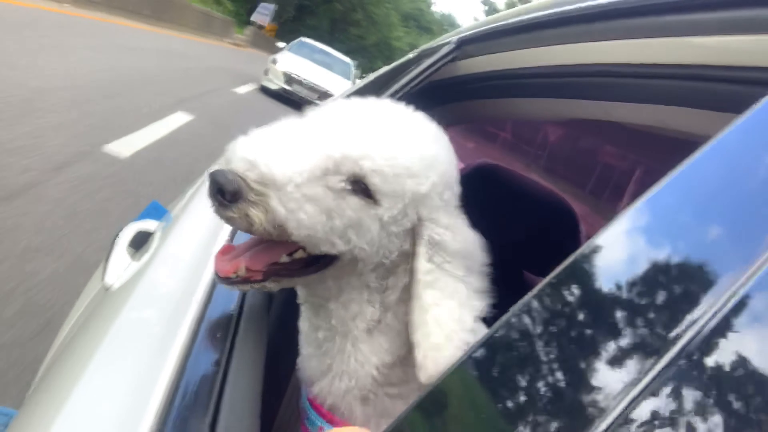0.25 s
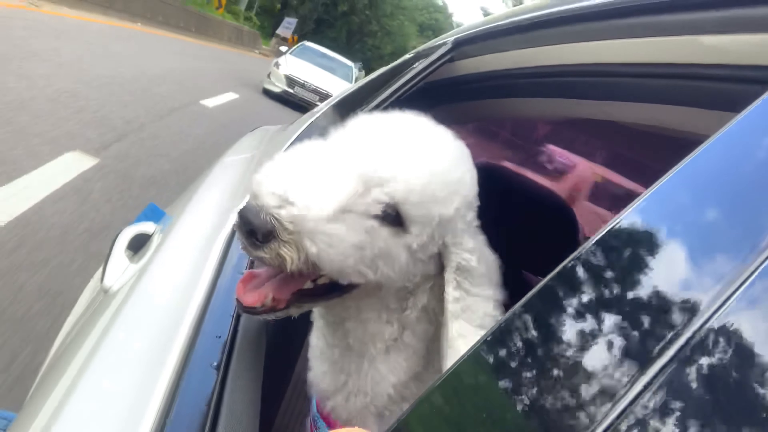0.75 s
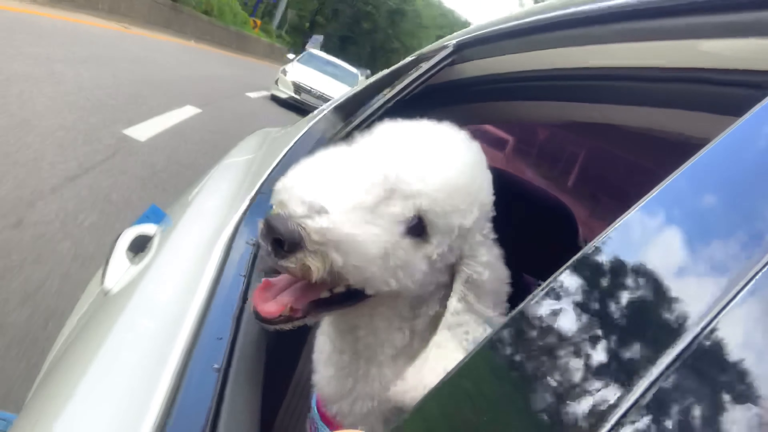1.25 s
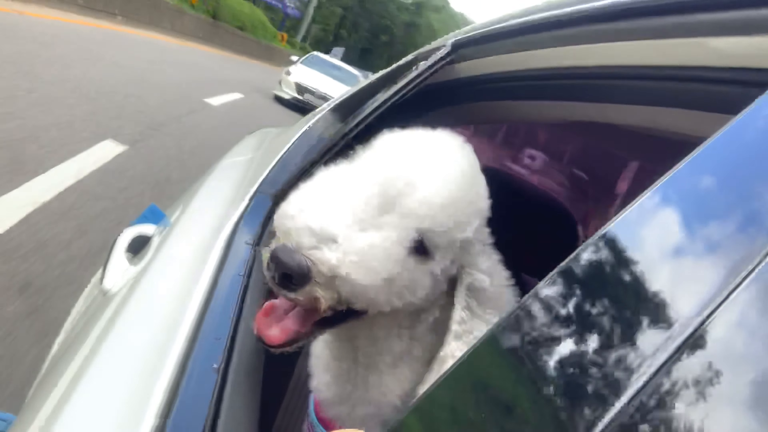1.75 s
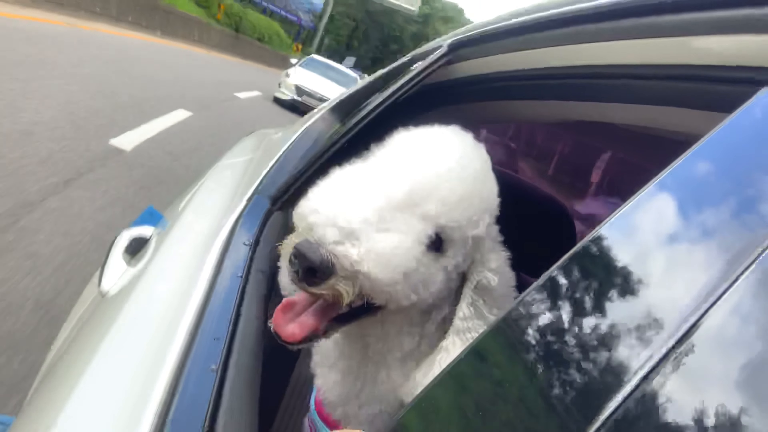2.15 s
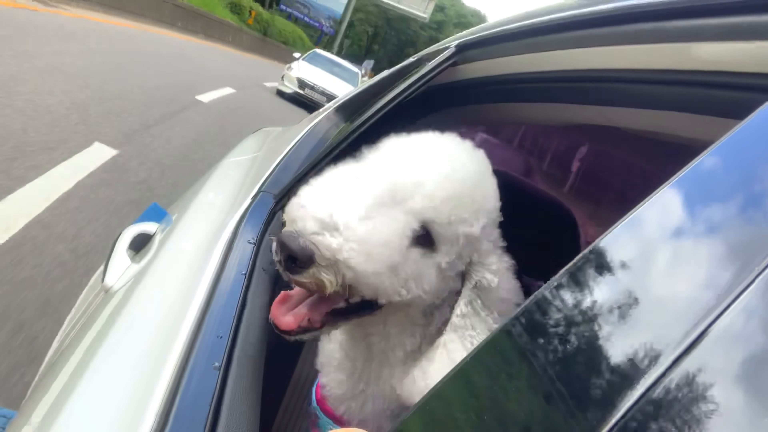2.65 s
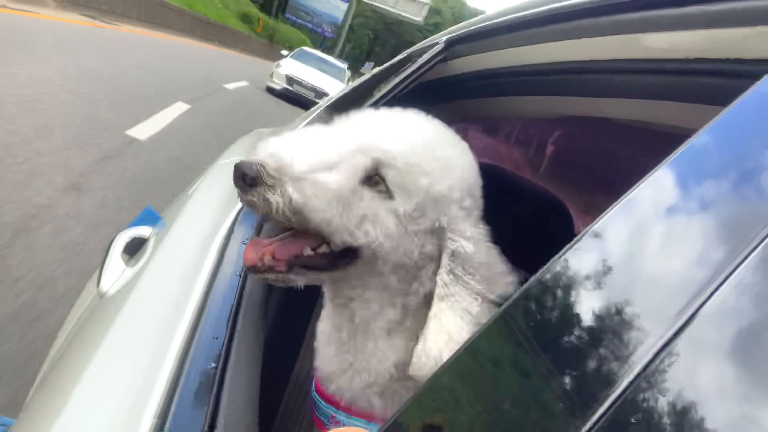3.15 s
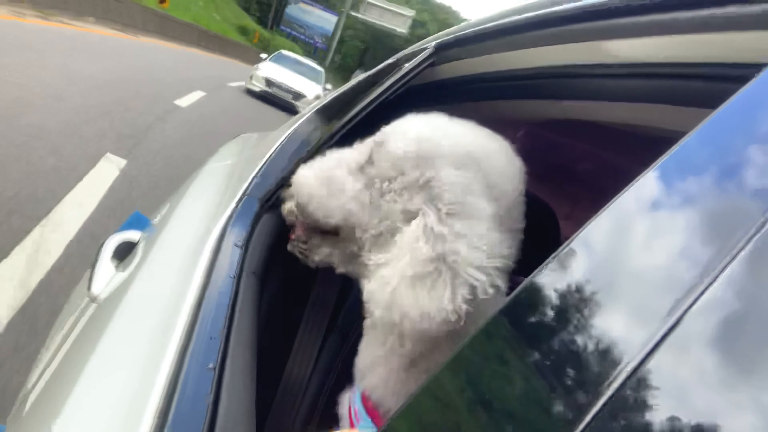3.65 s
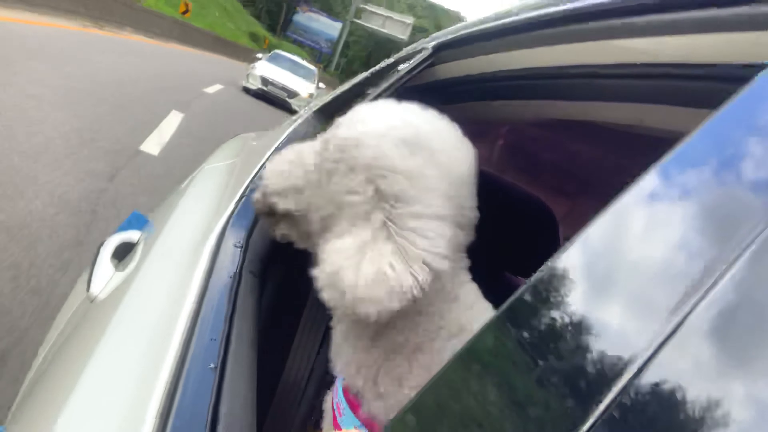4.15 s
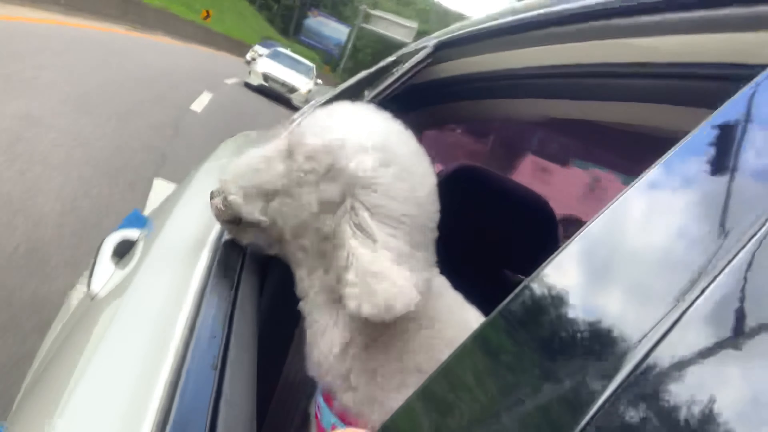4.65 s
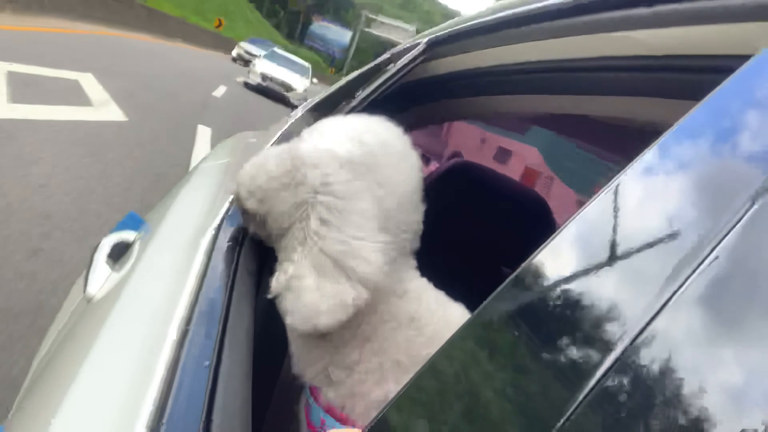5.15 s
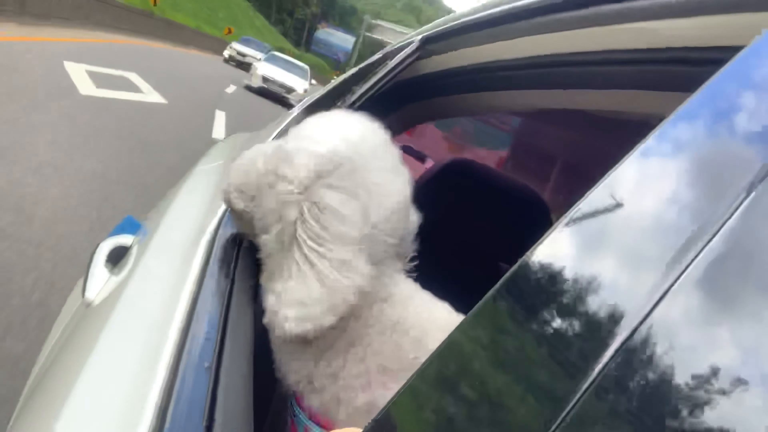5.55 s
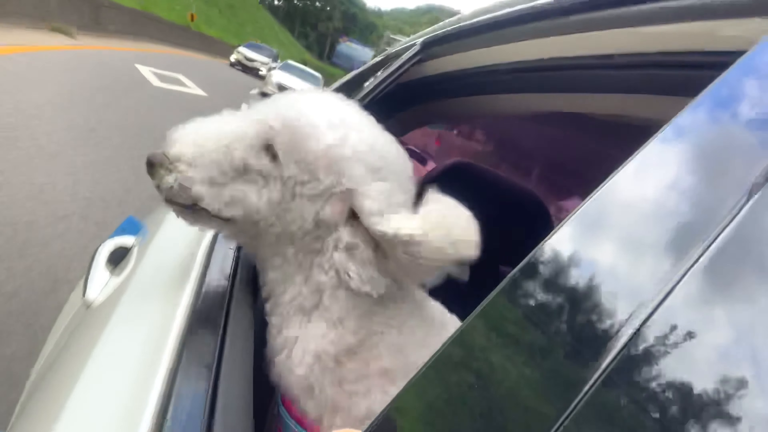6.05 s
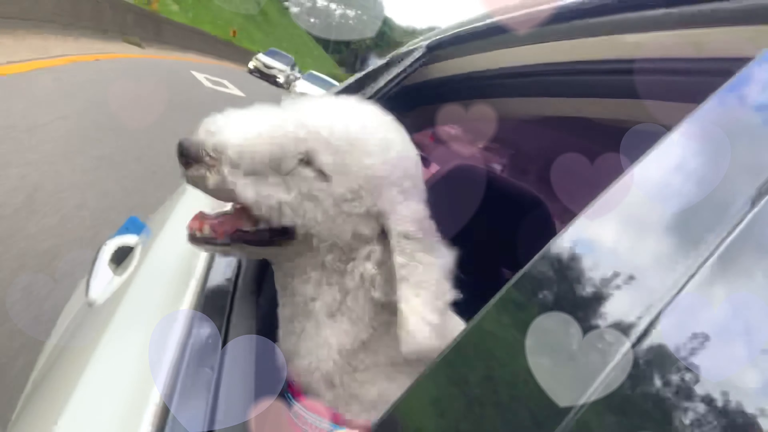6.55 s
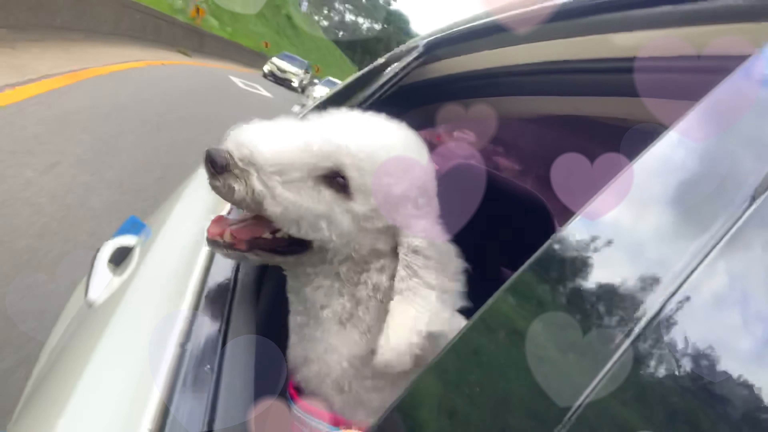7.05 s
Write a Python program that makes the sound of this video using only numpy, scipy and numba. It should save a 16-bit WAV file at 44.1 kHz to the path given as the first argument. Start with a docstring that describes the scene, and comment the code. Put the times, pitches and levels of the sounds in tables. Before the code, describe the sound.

At the open window of a car driving along a road, wind batters a phone microphone. Irregular deep thuds, fluttering flaps and short dry pops come in clusters over turbulent rumble and a dull rush of air and tyres. From just over three seconds an oncoming lorry adds a low roar, soft swish and hum dropping in pitch, mostly buried under the wind. The hardest blows distort.

```python
"""Thuds, flaps and pops of wind on a phone's microphone, held at the open window of a moving car.
Eddies of the slipstream are swells of band-limited noise, and torn flow gives short pops with a snap on top;
beneath lie turbulent rumble and the rush of air and tyres, noise whose bands flicker. From 3.3 s an oncoming
lorry adds a roar, a swish combed by the road echo, and a hum and a brief whine that fall by the Doppler effect.
The loudest blows overload the microphone."""
import sys
import numpy as np
from scipy import signal
from scipy.fft import rfft, irfft
from scipy.io import wavfile
from scipy.ndimage import uniform_filter1d
from numba import njit

SR = 44100
rng = np.random.default_rng(int(sys.argv[2]) if len(sys.argv) > 2 else 0)


def dump(signal):
    """Clip the signal to [-1, 1] and save it as 16-bit WAV at the path in sys.argv[1]."""
    limited = np.clip(np.atleast_2d(signal).T, -1, 1)
    pcm = np.round(limited * 32767).astype(np.int16)
    wavfile.write(sys.argv[1], SR, pcm)


N = 321394

# eddies that strike the port: (time [s], length [ms], thud level [dB], flap level [dB], crackle level [dB])
EDDY_BLOWS = [(0.118, 8.6, -14, -8.5, -16), (0.166, 14, -24, -19, -27), (0.208, 32, -5.5, -8.5, -25),
              (0.259, 23, -10.5, -29, -19.5), (0.294, 6.1, -13, -0.5, -13), (0.33, 13, -16, -13.5, -21),
              (0.352, 8.2, -21, -21, -20), (0.405, 6.3, -17, -20, -27), (0.433, 43, -15, -12.5, -17.5),
              (0.561, 18, -16, -4.5, -16), (0.622, 26, -12.5, -16.5, -21.5), (0.678, 9.9, -18, -28, -14.5),
              (0.745, 40, -17, -18, -19.5), (0.79, 20, -24, -18, -25), (0.84, 16, -19.5, -23, -28),
              (0.939, 20, -9.5, -23.5, -42), (1.011, 31, -16.5, -12.5, -29), (1.134, 5.9, -13, -5.5, -20),
              (1.168, 14, -6.5, -16, -23), (1.19, 16, -10.5, -14, -20), (1.236, 19, -12.5, -12, -20),
              (1.291, 24, -7, -22, -20), (1.379, 38, -10, -17, -20.5), (1.425, 10, -23, -21, -26),
              (1.475, 11, -22, -24, -25), (1.545, 35, -13, -14, -23.5), (1.578, 11, -19, -19, -24),
              (1.631, 12, -26, -12, -13.5), (1.669, 44, -13, -10.5, -20.5), (1.721, 12, -4.5, -14, -25),
              (1.785, 17, -17, -15, -23), (1.84, 17, -14, -14, -25), (1.925, 14, -13.5, -20, -28),
              (1.965, 33, -13.5, -15.5, -15.5), (2.073, 8.5, -18, -15, -27), (2.11, 23, -16, -16, -22.5),
              (2.153, 12, -17, -18, -26), (2.223, 17, -28, -19, -25), (2.33, 12.4, -5, -10.5, -18.5),
              (2.39, 22, -17, -16, -26), (2.457, 11, -7, -7, -18.5), (2.516, 17, -15, -12, -33),
              (2.549, 22, -6.5, -24, -22.5), (2.605, 14, -21, -21, -28), (2.708, 20, -6, -14, -20),
              (2.731, 5.8, -17, -18, -26), (2.742, 7.4, -17, -15, -21), (2.762, 7.6, -15, -14, -14),
              (2.787, 13, -12.5, -7, -15), (2.834, 14.5, -10, -5.5, -17), (2.85, 22, -11, -20, -33),
              (2.915, 8.6, -17.5, -28, -37), (2.934, 12, -24, -24, -30), (2.984, 12, -18.5, -20, -21),
              (3.085, 33, -23, -21.5, -26), (3.203, 6.6, -22, -12, -12), (3.259, 23, -10.5, -19, -26),
              (3.404, 43, -32, -12.5, -22.5), (3.607, 12.5, -12, -7, -12), (3.695, 43, -6.5, -31, -21),
              (3.775, 23, -6, -5, -13.5), (3.842, 9.6, -8, -22, -33), (3.938, 14, -12, -9, -13),
              (3.982, 19, -7.5, -9, -17), (4.072, 13, -11, -25, -26), (4.146, 9.6, -18, -6, -33),
              (4.208, 13, -13, -8.5, -20), (4.279, 65, -8.5, -15, -33), (4.381, 11.4, -17, -6.5, -16),
              (4.481, 11, -20, -6.5, -30), (4.534, 27, -12.5, -11, -27), (4.581, 21, -15, -8, -12.5),
              (4.634, 55, -10.5, -10, -22), (4.789, 56, -10, -14, -30), (4.876, 40, -25, -18, -21),
              (4.965, 12, -14, -15.5, -39), (5.139, 11, -14, -24, -46), (5.221, 8.6, -9.5, -24, -38),
              (5.32, 15, -4, -11, -33), (5.409, 15, -15, -19, -15), (5.517, 8.3, -11.5, -14, -44),
              (5.579, 8.1, -5, -8, -26), (5.623, 5.6, -10, -6.5, -22), (5.666, 16, -10.5, -6, -28),
              (5.806, 100, -11.5, -10, -25), (5.85, 74, -19, -12.5, -15), (6.007, 14, -7, -12, -38),
              (6.071, 22, -10, -9, -32), (6.134, 8.3, -9, -25, -15.5), (6.198, 22, -10, -11, -12),
              (6.256, 7.3, -9.5, -13, -36), (6.281, 7.2, -8, -9, -37), (6.309, 13.4, -16, -10, -16),
              (6.418, 18, -5, -12.5, -21.5), (6.495, 15, -18, -10, -35), (6.558, 24, -12.5, -24, -35),
              (6.69, 60, -18, -22, -27), (6.773, 16, -10, -36, -22), (6.837, 15, -7, -32, -42),
              (6.927, 75, -10, -23, -49), (7.028, 6.2, -9, -13, -37), (7.113, 14, -10.5, -8, -27),
              (7.191, 8.3, -11, -24, -19), (7.263, 100, -8.5, -11.5, -17)]
# thud, flap and crackle of one eddy, a row each:
# (centre [Hz], width [Hz], share of the eddy's length [0-1], added length [ms], lag [ms])
EDDY_PARTS = [(73.4, 109, 0.85, 9.1, 2.5), (236.7, 219, 0.36, 0.78, 0.53), (499, 326, 0.55, 3.1, -1.5)]
GRAIN_DB = 4.5  # spread of the grains in flap and crackle
# weaker eddies at random; thud and flap are relative to the stream
SMALL_PER_S, SMALL_MS, SMALL_THUD_DB, SMALL_FLAP_DB, SMALL_SCATTER_DB = 14, 11.3, 0, 0, 3
# crackle relative to the stream when calm, and dB lost per dB of stream above calm
SMALL_CRACKLE_DB, CRACKLE_DULLS = -11, 1


def small_eddies():
    """Turbulence is random: weak eddies come at chance moments and follow the strength of the stream."""
    s, size, *chance = scattered(SMALL_PER_S, size=4).T
    gust = gust_db(s)
    crackle_db = SMALL_CRACKLE_DB - CRACKLE_DULLS * np.maximum(gust - CALM_DB, 0)
    parts_db = (SMALL_THUD_DB, SMALL_FLAP_DB, crackle_db)
    levels = [gust + db + SMALL_SCATTER_DB * c for db, c in zip(parts_db, chance)]
    return np.transpose([s, SMALL_MS * np.exp(0.25 * size), *levels])


def buffets():
    """Turbulent pressure: each eddy is a swell of noise in three bands, with its own length and lag in each."""
    eddies = np.vstack([EDDY_BLOWS, small_eddies()])
    out = np.zeros(N)
    for part, (hz, width, share, more_ms, lag_ms) in enumerate(EDDY_PARTS):
        # the faster parts come in separate grains; the thud does not
        air = band(hz, width) * undb(min(part, 1) * GRAIN_DB * walk(180))
        for s, ms, *dbs in eddies:
            half = int((share * ms + more_ms) * SR / 1000)
            k = np.arange(-half, half)
            swell = np.cos(np.pi / 2 * k / half) ** 2
            add(out, air, k + int((s + lag_ms / 1000) * SR), swell, dbs[part])
    return out


# sharp pops as the flow tears off the port's edge:
# (time [s], nominal peak [dB], snap [dB re peak], pitch [Hz], decay [ms])
EDGE_POPS = [(0.113, -9, -14, 565, 3.9), (0.19, -10.5, -17, 610, 10), (0.288, -6, -7.5, 570, 4.9),
             (0.327, -13, -34, 630, 5.7), (0.43, -8, -34, 790, 3.7), (0.467, -21, -10, 900, 3),
             (0.549, -17, -30, 600, 3.3), (0.556, -7, -12, 566, 3.5), (0.614, -15, -27, 565, 5),
             (0.679, -28, -26, 719, 5), (0.702, -10, -32, 627, 4.5), (0.711, -23, -17, 905, 3),
             (0.741, -12, -40, 805, 7.8), (1.008, -10, -24, 596, 5.5), (1.092, -24, -17, 1200, 3),
             (1.128, -18, -29, 600, 7.1), (1.184, -22, -23, 600, 4), (1.227, -10, -17, 600, 4.5),
             (1.358, -17, -16, 592, 5.4), (1.375, -16, -28, 600, 4), (1.42, -21, -3, 1300, 3),
             (1.456, -19, -8, 1150, 3), (1.49, -28, -11, 1200, 3), (1.507, -16, -17, 573, 4.3),
             (1.541, -14, -12, 1410, 3.3), (1.574, -12.5, -24, 794, 4), (1.617, -12, -33, 662, 5),
             (1.668, -25, -24, 600, 5), (1.72, -26, -28, 961, 5), (1.795, -26, -20, 900, 4),
             (1.838, -29, -22, 800, 3.7), (1.949, -23, -25, 654, 5), (2.325, -23, -32, 786, 5),
             (2.448, -12, -18, 610, 5), (2.462, -7, -20, 700, 4), (2.699, -12, -20, 990, 6.3),
             (2.757, -10, -30, 616, 5.8), (2.781, -17, -22, 890, 3.3), (2.826, -20, -10, 900, 5),
             (2.862, -33, -10, 900, 3), (2.979, -29, -28, 604, 3.5), (3.201, -25, -33.5, 552, 4.3),
             (3.255, -12.5, -26, 600, 5), (3.316, -24, -9, 1400, 3), (3.601, -11.5, -8, 570, 4.1),
             (3.73, -14, -12, 1200, 3), (3.746, -12, -11, 880, 2.6), (3.823, -7, -20, 649, 5),
             (3.922, -19, -20, 1050, 5), (4.01, -11, -28, 597, 4), (4.07, -28, -25, 813, 5),
             (4.115, -20, -14, 1200, 2.7), (4.163, -10, -24, 573, 5.7), (4.479, -10, -13, 674, 6),
             (4.58, -11, -31, 552, 11), (4.619, -4.5, -29, 584, 3), (4.862, -13.5, -27, 552, 4.3),
             (5.519, -15.5, -20, 1220, 6.1), (5.614, -10, -25, 1400, 4.1), (5.66, -14, -22, 930, 5.7),
             (5.802, -11, -22, 650, 4), (5.811, -9, -12, 1100, 4), (5.838, -9, -14, 895, 5),
             (5.858, -10.5, -28, 930, 13), (5.882, -18, -21, 900, 5), (6.044, -25, -14, 1410, 3),
             (6.065, -10, -28, 864, 7.9), (6.19, -10, -35, 584, 4.6), (7.108, -17, -23, 670, 4.6),
             (7.254, -6.5, -16, 880, 5)]
POP_WIDTH_HZ, POP_TOP_HZ = 550, 3020
SNAP_HZ, SNAP_WIDTH_HZ, SNAP_TOP_HZ = 2530, 2500, 4470
SNAP_LEAD_MS = 1.6  # the small eddies arrive first
POP_PEAK_MS, POP_RISE_SHARE = 3.35, 0.6  # peak after the onset; rise time as a share of the decay
POP_CREST_DB, SNAP_CREST_DB = 10, 11  # assumed peak over rms
# weaker pops at random: level in a calm stream, its scatter, snap re peak, middle pitch, decay
TICKS_PER_S, TICK_DB, TICK_SCATTER_DB, TICK_SNAP_DB = 28, -25.5, 4.5, -23.5
TICK_HZ, TICK_DECAY_MS = 830, 2
TICKS_DROWN = 0.43  # dB lost per dB of a stronger stream


def ticks():
    """Random shedding: weak pops at chance moments, fainter when the stream is strong."""
    s, loud, bright, high = scattered(TICKS_PER_S, size=3).T
    stream_db = np.interp(s, *np.transpose(STREAM_LEVELS))
    peak_db = TICK_DB - TICKS_DROWN * (stream_db - CALM_DB) + TICK_SCATTER_DB * loud
    snap_db = TICK_SNAP_DB + TICK_SCATTER_DB * bright
    pitch_hz = TICK_HZ * np.exp(0.31 * high)
    return np.transpose([s, peak_db, snap_db, pitch_hz, np.full(len(s), TICK_DECAY_MS)])


def pops():
    """Flow separation: a quick swell that falls more slowly than it rises, under a shorter, brighter snap."""
    rows = np.vstack([EDGE_POPS, ticks()])
    rows = rows[np.argsort(rows[:, 0])]
    # the resonance holds the pitch of the latest pop
    latest = np.maximum(np.searchsorted(rows[:, 0], np.arange(N) / SR) - 1, 0)
    body_air = band(rows[latest, 3], POP_WIDTH_HZ)
    snap_air = band(SNAP_HZ, SNAP_WIDTH_HZ)
    bodies, snaps = np.zeros(N), np.zeros(N)
    k = np.arange(-SR // 50, SR // 25)
    ms = k * 1000 / SR - POP_PEAK_MS
    for s, db, snap_db, _, decay_ms in rows:
        swell = 1 / np.cosh(2 * ms / (decay_ms * np.where(ms < 0, POP_RISE_SHARE, 1)))
        add(bodies, body_air, k + int(s * SR), swell, db - POP_CREST_DB)
        snap_at = k + int((s - SNAP_LEAD_MS / 1000) * SR)
        add(snaps, snap_air, snap_at, swell ** 2, db + snap_db - SNAP_CREST_DB)
    return low(bodies, POP_TOP_HZ, order=2) + low(snaps, SNAP_TOP_HZ, order=2)


# strength of the slipstream between the blows: (time [s], level [dB])
STREAM_LEVELS = [(0.0, -19.5), (0.16, -24.5), (0.3, -18.5), (0.85, -22), (0.95, -23), (1.38, -22.5),
                 (2.29, -19), (2.7, -25.5), (2.9, -24), (3.65, -15.5), (3.84, -16), (4.1, -17), (4.93, -20),
                 (5.62, -18), (6.21, -17), (6.54, -22.5), (6.88, -21), (7.29, -20)]
# brief lulls, when the flow leaves the port alone: (time [s], twice the standard deviation [ms], change [dB])
STREAM_LULLS = [(0.027, 18, -9), (0.517, 70, -8), (0.886, 73, -3), (1.073, 44, -9), (1.874, 56, -7.5),
                (2.047, 72, -4), (2.197, 36, -6), (2.294, 79, -9), (2.675, 30, -0.5), (2.889, 37, -5),
                (2.958, 23, -4), (3.531, 320, -8.5), (6.624, 35, -3), (6.742, 23, -20), (6.973, 39, -2)]
CALM_DB = -26.5  # stream level that counts as calm


def gust_db(s):
    """Slow modulation: strength of the stream in dB, with bell-shaped lulls."""
    lulls = sum(db * np.exp(-((s - at) * 1000 / ms) ** 2 * 2) for at, ms, db in STREAM_LULLS)
    return np.interp(s, *np.transpose(STREAM_LEVELS)) + lulls


# rumble and flutter are relative to the stream; rustle is the level in a calm stream
RUMBLE_DB, RUMBLE_HZ, RUMBLE_WIDTH_HZ = 0.5, 67, 135
FLUTTER_DB, FLUTTER_HZ, FLUTTER_WIDTH_HZ = -7, 222, 326
RUSTLE_DB, RUSTLE_FOLLOWS = -37.5, 0.6  # the finest eddies follow the stream only in part (dB per dB)


def stream():
    """Correlated turbulence: small eddies shake the port, their bursts rising together in three bands."""
    gust = gust_db(np.arange(N) / SR)
    shake, crackle = walk(30), walk(200)
    rumble_db = gust + RUMBLE_DB + 0.87 * walk(18) + 1.54 * shake
    rumble = undb(rumble_db) * band(RUMBLE_HZ, RUMBLE_WIDTH_HZ)
    flutter = undb(gust + FLUTTER_DB + 2.5 * shake) * band(FLUTTER_HZ, FLUTTER_WIDTH_HZ)
    flicker_db = 0.8 * shake + 3.5 * crackle
    rustle = undb(RUSTLE_DB + RUSTLE_FOLLOWS * (gust - CALM_DB) + flicker_db) * band(910, 2900)
    return rumble + flutter + rustle


# oncoming lorry: (time [s], roar level [dB], swish level [dB], treble level [dB], hum level [dB])
LORRY_LEVELS = [(3.3, -22, -85, -89, -32), (3.7, -23.5, -65, -70, -30.5), (3.95, -21.5, -56, -78, -36),
                (4.1, -23, -51, -67, -38), (4.4, -21, -46.5, -66, -23), (4.62, -21, -52.5, -71, -31),
                (4.75, -28, -56, -68, -31), (5.2, -36.5, -46, -58, -25), (5.5, -25, -46.5, -62, -25),
                (5.8, -29, -51, -64, -23.5), (6.0, -29, -54, -62, -24.5), (6.4, -43, -63, -66, -32),
                (7.29, -36, -57, -66, -23.5)]
# first two comb teeth, where direct sound and road echo add up: (width [Hz], level [dB re swish])
COMB_TEETH = [(900, -2.5), (1300, -6.5)]
# it closes fast, and draws away more slowly round the bend
PASSES_S, NEAREST_M, CLOSING_M_S, LEAVING_M_S = 4.77, 9.5, 19, 16
FADE_IN_S = .25
ECHO_LAG_MS, SWISH_TOP_HZ, TOOTH_TOP_HZ = .52, 7300, 3300  # lag when nearest; ceiling of the tooth spacing
HUM_HZ, WHINE_HZ = 279.5, 10750  # at the source
HUM_WOBBLE, HUM_ROUGH_DB = .006, -3  # share of the pitch; noise about the tone
WHINE_FROM_S, WHINE_TO_S, WHINE_FADE_S = 4.15, 5.25, .15
WHINE_DB, WHINE_DB_PER_S = -65.5, 3  # level at the pass, and its steady rise


def lorry_swish(metres, swish_db, treble_db):
    """Interference: tyre noise meets its road echo, so a comb, set here as noise bands, sweeps down and up."""
    swish = low(band(2250, 4400), SWISH_TOP_HZ, order=4)
    # the road echo lags most when the lorry is level with the window
    tooth_hz = np.minimum(1000 / ECHO_LAG_MS * metres / NEAREST_M, TOOTH_TOP_HZ)
    # rough tarmac scatters the treble, so only the lower teeth of the comb form
    teeth = sum(undb(db) * band(k * tooth_hz, width) for k, (width, db) in enumerate(COMB_TEETH, start=1))
    hiss = band(11100, 6000)
    treble = hiss - low(hiss, 7200, order=4)
    return flicker(undb(swish_db) * (swish + teeth) + undb(treble_db) * treble)


def lorry_hum(doppler, hum_db):
    """Doppler effect: a wobbling tone, roughened by narrow noise about it, drops in pitch at the pass."""
    hum_hz = HUM_HZ * doppler * (1 + HUM_WOBBLE * walk(10))
    tone = unit(np.sin(2 * np.pi * np.cumsum(hum_hz) / SR))
    return undb(hum_db + 2.65 * walk(12)) * (tone + undb(HUM_ROUGH_DB) * band(hum_hz, 25))


def lorry_whine(t, doppler):
    """Doppler effect: a high, narrow noise band falls in pitch while the lorry is alongside."""
    alongside = np.clip(np.minimum(t - WHINE_FROM_S, WHINE_TO_S - t) / WHINE_FADE_S, 0, 1)
    level_db = WHINE_DB + WHINE_DB_PER_S * (t - PASSES_S) + 3 * walk(70)
    return alongside * undb(level_db) * band(WHINE_HZ * doppler * (1 + .004 * walk(20)), 450)


def lorry():
    """Moving source: distance sets the comb, and radial speed the pitch, of one passing vehicle."""
    roar_db, swish_db, treble_db, hum_db = curves(LORRY_LEVELS)
    t = np.arange(N) / SR
    speed = np.where(t < PASSES_S, CLOSING_M_S, LEAVING_M_S)
    along = speed * (t - PASSES_S)
    metres = np.hypot(along, NEAREST_M)
    doppler = 1 - speed * along / metres / 343  # first order in radial speed over sound speed
    roar = undb(roar_db + 1.4 * walk(23)) * low(band(404, 420), 594, order=4)
    swish = lorry_swish(metres, swish_db, treble_db)
    tones = lorry_hum(doppler, hum_db) + lorry_whine(t, doppler)
    fade_in = np.clip((t - LORRY_LEVELS[0][0]) / FADE_IN_S, 0, 1)
    return fade_in * (roar + swish + tones)


# spectrum of the air and tyres of the car itself, relative levels: (frequency [Hz], density [dB per Hz])
RUSH_SPECTRUM = [(400, -18.5), (700, -16), (1000, -22), (1340, -26), (2000, -30), (2700, -36.5),
                 (4300, -41), (6370, -45.5), (7280, -50), (8330, -45.5), (9300, -49), (10200, -55.5),
                 (14300, -63.5)]
# slow swell of the rush: (time [s], gain [dB])
RUSH_GAIN = [(0, 4), (1, 1.5), (3.4, 1), (4.5, 5.5), (6, 5), (7.29, 5)]
RUSH_DB = -38.5  # rms before the swell


def rush():
    """Broadband flow noise: a smooth coloured roar whose bands flicker each on their own."""
    hz, db = np.transpose(RUSH_SPECTRUM)
    bins = np.maximum(np.fft.rfftfreq(N, 1 / SR), 1)
    bass_fall = np.minimum(bins / hz[0], 1) ** 2
    colour = undb(np.interp(np.log(bins), np.log(hz), db)) * bass_fall
    roar = unit(irfft(rfft(rng.standard_normal(N)) * colour, N))
    return flicker(roar) * undb(RUSH_DB + curves(RUSH_GAIN)[0])


FLICKER_DB = 2.0


def flicker(x):
    """Independent modulation: gusts along the path make each band waver by itself."""
    out, below = 0, 0
    for top_hz in (1500, 2800, 5000, 7300, 9800, 12500, 20000):
        upto = low(x, top_hz, order=4)
        out = out + (upto - below) * undb(FLICKER_DB * walk(85))
        below = upto
    return out


def undb(db):
    """Decibel law: amplitude ratio of a level."""
    return 10 ** (np.asarray(db) / 20)


def unit(x):
    """Power normalisation: scale to rms 1."""
    return x / np.sqrt(np.mean(x ** 2))


def curves(table):
    """Linear interpolation: columns joined by straight lines in time."""
    s, *columns = np.transpose(table)
    return [np.interp(np.arange(N) / SR, s, c) for c in columns]


@njit
def svf(x, hz, width):
    """Resonance: a state-variable band-pass with a moving centre, gain 1 there."""
    y, b, l = np.empty(len(x)), 0., 0.  # b and l are the band and low states
    for i in range(len(x)):
        g, k = np.tan(np.pi * hz[i] / SR), width / hz[i]
        v = (b + g * (x[i] - l)) / (1 + g * (g + k))
        b, l, y[i] = 2 * v - b, l + 2 * g * v, k * v
    return y


def band(hz, width):
    """Filtered noise: white noise through a resonance applied twice, rms 1."""
    hz = np.full(N, 1.) * hz
    once = svf(rng.standard_normal(N), hz, 1. * width)
    return unit(svf(once, hz, 1. * width))


def walk(rate):
    """Random modulation: chance levels held 1 / rate s and smoothed twice, rms 1."""
    k = int(SR / rate)
    held = np.repeat(rng.standard_normal(N // k + 1), k)
    return unit(uniform_filter1d(uniform_filter1d(held, k), k)[:N])


def low(x, hz, order):
    """Zero-phase filtering: a low-pass run forwards and backwards."""
    return signal.sosfiltfilt(signal.butter(order, hz, fs=SR, output="sos"), x)


def scattered(per_s, size):
    """Uniform random arrivals: chance moments, each with some normal values."""
    count = int(per_s * N / SR)
    chance = rng.standard_normal((count, size))
    return np.column_stack([rng.uniform(0, N / SR, count), chance])


def add(out, air, at, swell, db):
    """Enveloped noise: add a burst under the given swell, its weighted rms set by db."""
    inside = (at >= 0) & (at < N)
    at, swell = at[inside], swell[inside]
    strength = np.sqrt(np.sum((air[at] * swell) ** 2) / np.sum(swell ** 2))
    out[at] += undb(db) * swell * air[at] / strength


EDDY_TOP_HZ = 1617


def scene():
    """Superposition: the pressures of all sources add at the port."""
    # whole eddies are too large to carry treble
    eddies = low(buffets() + stream(), EDDY_TOP_HZ, order=2)
    return (eddies + pops() + lorry() + rush())[None]


# dips from the port and case: (centre [Hz], width [Hz])
CASE_DIPS = [(686, 575), (7440, 690)]
# the lower dip deepens and the upper one mostly fills, perhaps as the phone turns:
# (time [s], lower depth [0-1], upper depth [0-1])
CASE_DIP_DEPTHS = [(0, 0.19, 0.43), (3.4, 0.3, 0.43), (4.2, .5, .45), (5.2, 0.57, .25), (7.29, 0.52, 0.4)]
CEILING, KNEE = .66, 5.  # limit of the low band (full scale 1); sharpness of the bend
SPLIT_HZ, TOP_HZ = 2000, 15150


def record(dry):
    """Transduction: bass cut, dips from port and case, low-band saturation at the ceiling, and a top cut."""
    x = signal.sosfilt(signal.butter(4, 38, "highpass", fs=SR, output="sos"), dry[0])
    for (hz, width), depth in zip(CASE_DIPS, curves(CASE_DIP_DEPTHS)):
        x = x - depth * svf(x, np.full(N, 1. * hz), 1. * width)
    bass = low(x, SPLIT_HZ, order=2)
    held = bass / (1 + np.abs(bass / CEILING) ** KNEE) ** (1 / KNEE)
    # a second low-pass softens the overtones of the overload
    x = x - bass + low(held, 2 * SPLIT_HZ, order=2)
    return signal.sosfilt(signal.ellip(10, .2, 80, TOP_HZ, fs=SR, output="sos"), x)[None]


dry = scene()
out = record(dry)
dump(out)
```